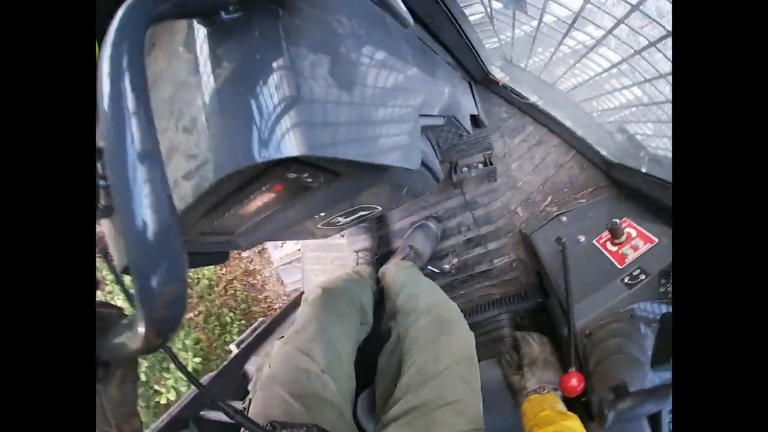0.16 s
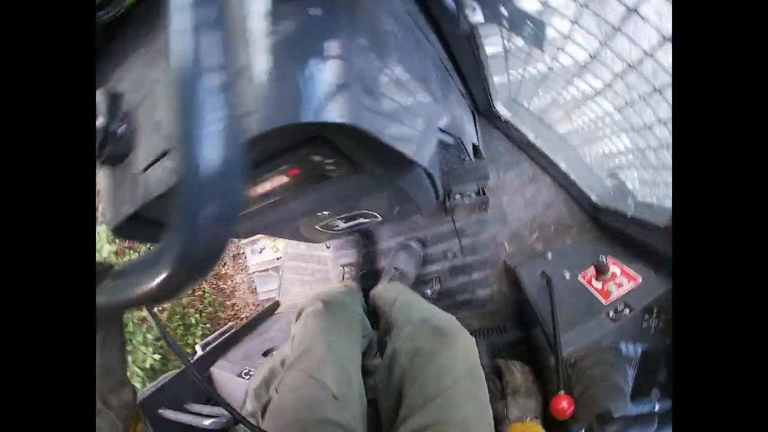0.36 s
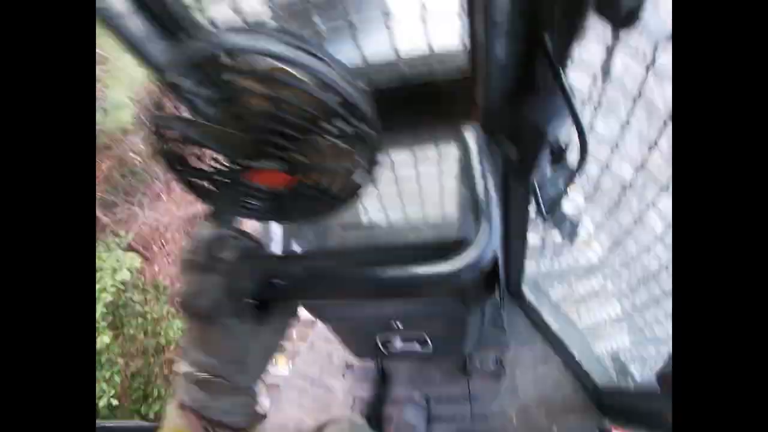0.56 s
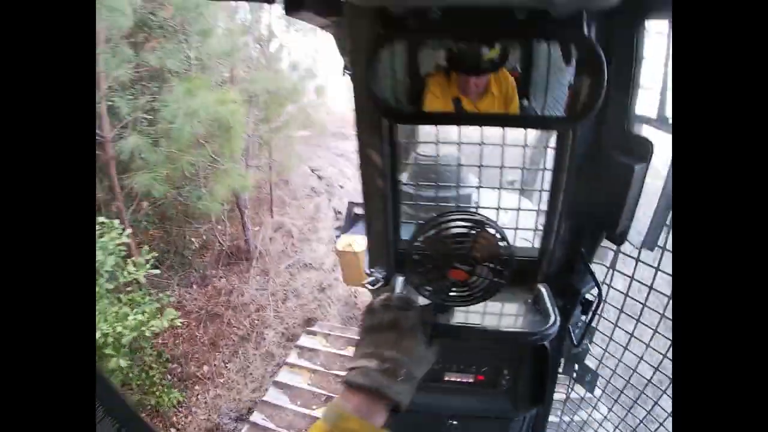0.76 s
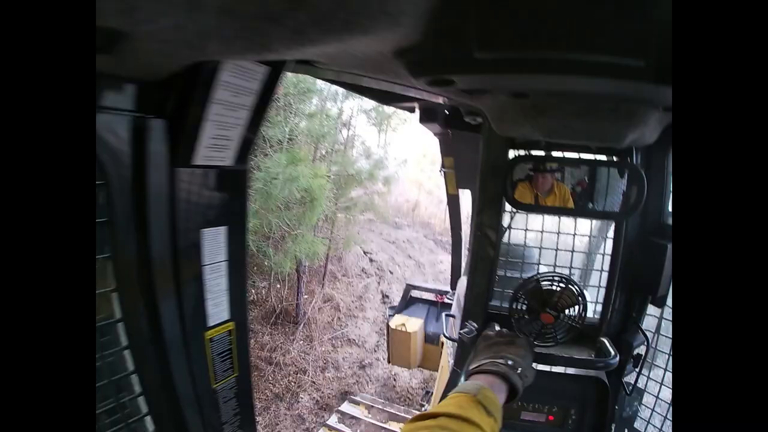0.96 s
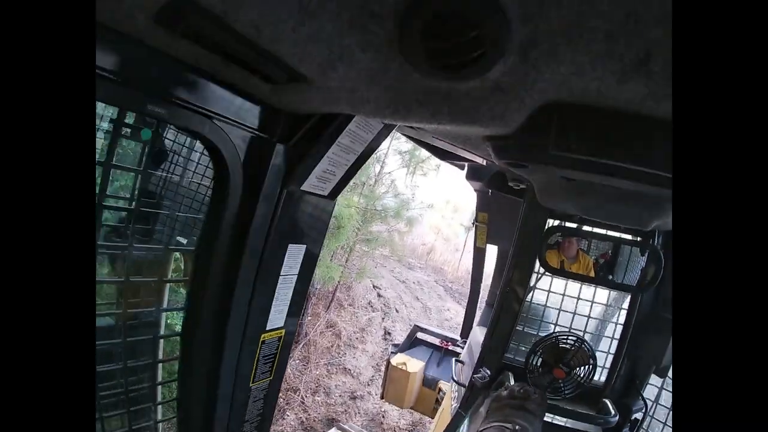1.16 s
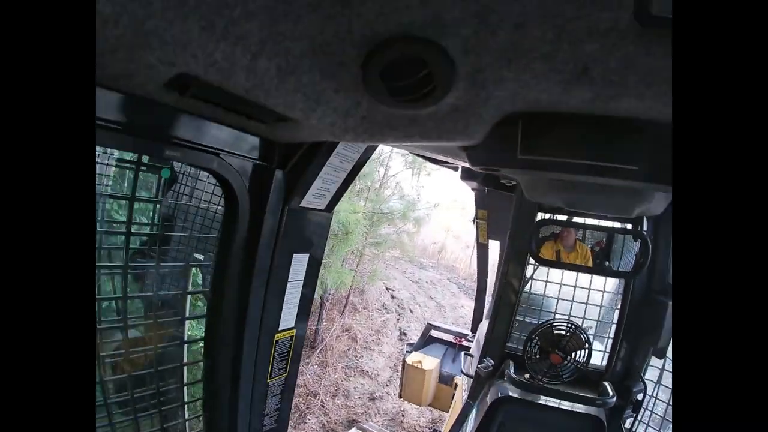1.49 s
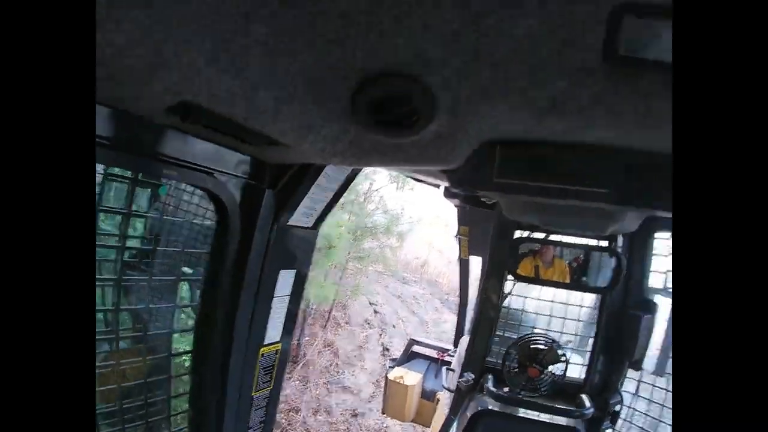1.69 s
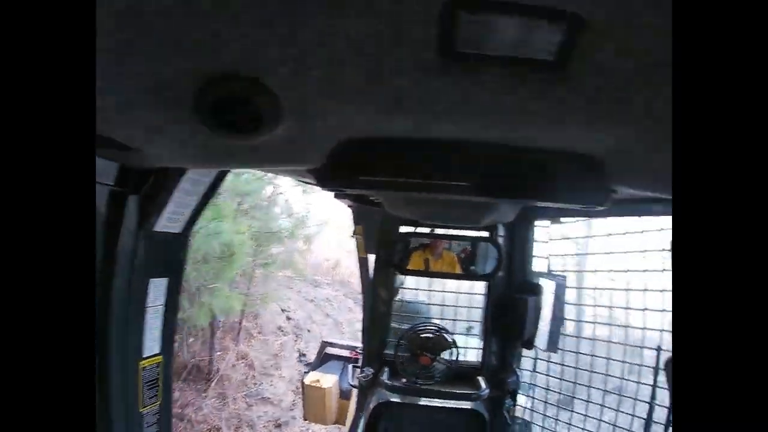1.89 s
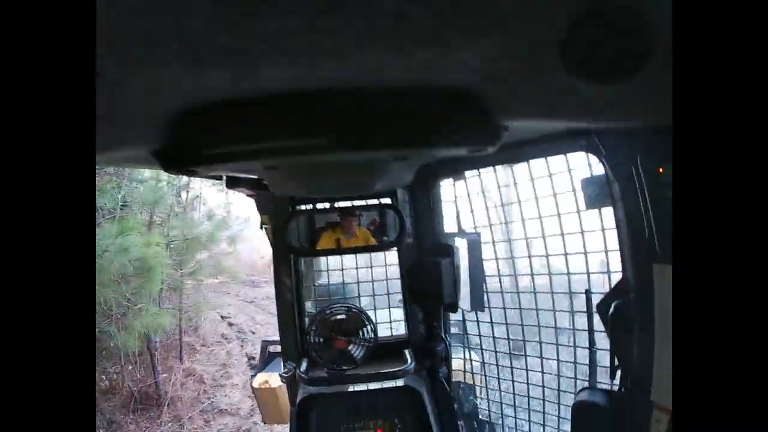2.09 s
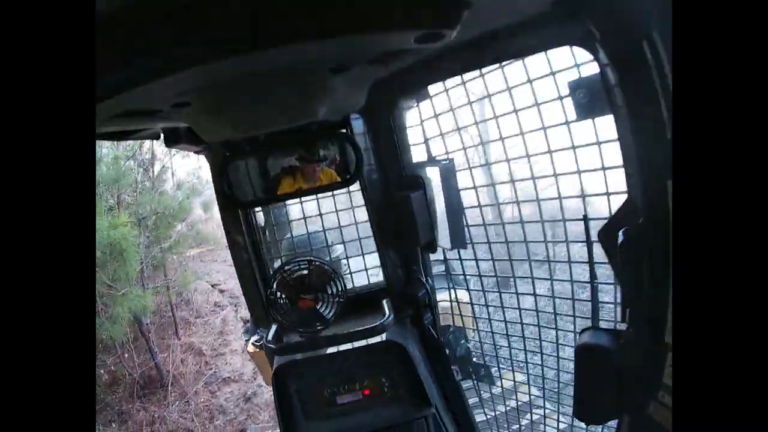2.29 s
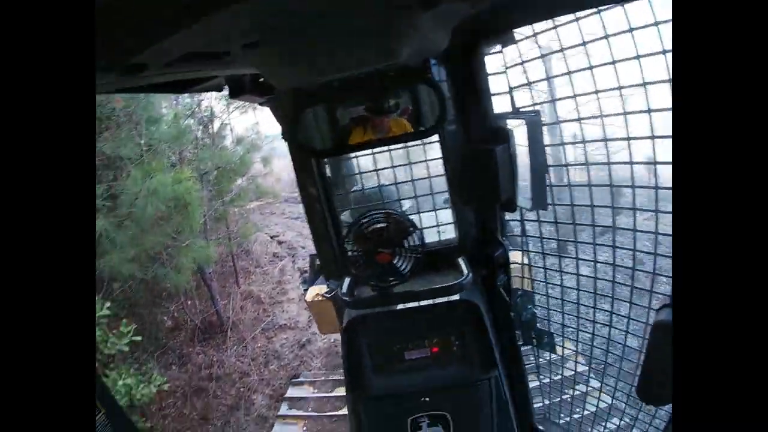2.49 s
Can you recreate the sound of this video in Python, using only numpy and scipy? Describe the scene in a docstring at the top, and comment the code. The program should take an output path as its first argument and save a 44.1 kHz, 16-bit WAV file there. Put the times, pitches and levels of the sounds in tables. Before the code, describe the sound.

A diesel engine rumbles at constant speed inside a closed bulldozer cab, heard close at the driver's head. At first, low firing tones and steady pump hum sit in a dull roar, with a faint whistle gone by about 0.4 s. From 0.7 s a deep fan drone swells; booms and faint hollow rings waver until 2 s. Near 2.2 s a panel ring briefly flares. Soft combustion clatter pulses throughout.

```python
"""A four-cylinder diesel runs at a steady speed, heard at the driver's head in the closed cab of a crawler dozer.
First the head is low: firing tones and pump hum in a dull filtered-noise roar, with a thin whistle that soon fades.
As the head rises through the standing waves of the cab, the fan drone grows, then booms and panel rings come and go.
Past 2 s it sinks most of the way back and a panel ring flares. Tones are fluttering sines at levels drawn over time;
faint combustion clatter pulses the treble of the roar throughout."""
import sys
import numpy as np
from scipy import signal
from scipy.fft import rfft, irfft
from scipy.io import wavfile
from scipy.ndimage import uniform_filter1d

SR = 44100
rng = np.random.default_rng(int(sys.argv[2]) if len(sys.argv) > 2 else 0)


def transcribe(u):
    """Save the signal u as a 16-bit wav file named by the first command-line argument.

    u: samples, shape (n,) or (channels, n), limited to [-1, 1]; the rate is SR.
    q: integer samples, one column per channel.
    """
    v = np.clip(np.atleast_2d(u).T, -1, 1)
    q = np.round(v * 32767).astype(np.int16)
    wavfile.write(sys.argv[1], SR, q)


N = 116865
T = np.arange(N) / SR

# Levels are in dB re full scale, before the gain control on the bass; "gain_db" is added to another level.
# Height of the head: time_s, height (0 bent down - 1 upright)
HEAD_HEIGHT = [(0, 0), (.55, 0.22), (.8, 0.31), (1.1, 0.68), (1.5, 0.83), (1.95, 0.81), (2.25, 0.5),
               (2.5, 0.36), (2.65, 0.21)]

# Engine tones: multiple of the crank rate, down_db, upright_db
ENGINE_ORDERS = [(1, -50, -57.5), (4, -61, -55.5), (5, -52, -61), (7, -53, -53.5), (9, -53, -67.5),
                 (10, -60.5, -53), (12, -66.5, -52.5), (13, -70.5, -60), (14, -62.5, -61.5)]
# Firing tone: time_s, level_db
FIRING_LEVEL = [(0, -46.5), (.75, -47.5), (.87, -45), (1.0, -44), (1.22, -40), (1.45, -42.5), (1.54, -53),
                (1.61, -42), (1.68, -49), (1.74, -38.5), (2.04, -46), (2.11, -55), (2.17, -39), (2.32, -45),
                (2.65, -52.5)]
# Third harmonic of the firing tone: time_s, level_db
THROB_LEVEL = [(0, -47.5), (.15, -43), (.7, -42), (.8, -43.5), (.96, -38.5), (1.02, -49), (1.14, -42),
               (1.22, -53), (1.38, -46.5), (2.2, -51.5), (2.65, -46)]
# Fan drone: time_s, level_db
FAN_LEVEL = [(0, -58), (.45, -57.5), (.65, -44.5), (.85, -37.5), (1.3, -40), (1.52, -36), (2.1, -37),
             (2.65, -39)]

# Pump harmonics under the hum's gain curve: multiple of the pump rate, down_db, upright_db, flutter (0-1)
PUMP_TONES = [(1, -45, -46.5, .25), (4, -67.5, -74, 0.98), (5, -71.5, -66, 0.5)]
# Swell of those pump harmonics: time_s, gain_db
PUMP_GAIN = [(0, 1.5), (.35, 4), (.76, -0.5), (.86, -13), (1.0, -3.5), (1.85, 3), (2.2, -5), (2.45, -0.5),
             (2.65, -20)]
# Second and third pump harmonics, with standing waves of their own: time_s, level_db
PUMP_SECOND_LEVEL = [(0, -49.5), (.15, -45), (.38, -46), (.52, -47), (.76, -46.5), (.85, -56.5),
                     (.98, -49.5), (1.15, -50.5), (1.25, -43.5), (1.36, -50), (1.52, -48.5), (1.67, -46),
                     (1.8, -47), (2.1, -50.5), (2.65, -55.5)]
PUMP_THIRD_LEVEL = [(0, -59), (.25, -56), (.35, -72.5), (.62, -72), (.7, -63), (.77, -74), (.98, -67.5),
                    (1.05, -57), (1.32, -61), (1.45, -71), (2.65, -63)]

# Narrow air resonances of the cab: time_s, level_db
LOW_BOOM_LEVEL = [(0, -43.5), (.2, -37.5), (0.348, -39), (.55, -38), (.85, -42), (1.1, -51), (2.0, -61.5),
                  (2.3, -56), (2.5, -41.5), (2.65, -67)]
HIGH_BOOM_LEVEL = [(0, -38.5), (.45, -48), (.72, -56.5), (1.2, -56.5), (1.3, -39), (1.42, -46.5),
                   (1.6, -58), (1.7, -37.5), (1.78, -47.5), (2.06, -41), (2.14, -58), (2.26, -51),
                   (2.32, -57.5), (2.65, -50)]
# Panel rings: time_s, level_db
LOW_RING_LEVEL = [(0, -71.5), (1.899, -72.5), (2.08, -62), (2.15, -62), (2.24, -51), (2.3, -75),
                  (2.65, -77)]
HIGH_RING_LEVEL = [(0, -84), (1.0, -74.5), (1.33, -66.5), (1.42, -60), (1.68, -62), (1.8, -64),
                   (1.98, -72.5), (2.65, -77)]
# Panel rings, before their wander: time_s, pitch_hz
LOW_RING_PITCH = [(0, 943), (1.8, 980), (2.05, 1040), (2.17, 1073), (2.25, 1050), (2.65, 1040)]
HIGH_RING_PITCH = [(0, 1310), (1.3, 1315), (1.5, 1340), (1.68, 1305), (1.82, 1340), (2.65, 1310)]

# Other steady machine hums: pitch_hz, down_db, upright_db, flutter (0-1)
MACHINE_HUMS = [(59.55, -48.5, -49.5, 0.2), (856.5, -79.5, -69, 1)]
# Gear whine: time_s, level_db
GEAR_LEVEL = [(0, -58.5), (.35, -61), (.48, -67), (.74, -72), (.87, -56.5), (1.3, -70), (1.48, -62.5),
              (1.8, -55.5), (2.12, -67), (2.24, -64), (2.4, -61), (2.65, -58.5)]
# Thin whistle: time_s, level_db
WHISTLE_LEVEL = [(0, -68), (.04, -66.5), (.26, -67.5), (.31, -62), (.355, -61), (.385, -76), (.72, -79),
                 (.85, -71.5), (.93, -72.5), (1.0, -84), (1.2, -80), (1.3, -72), (1.6, -78), (2.65, -79)]
# Thin whistle: time_s, pitch_hz
WHISTLE_PITCH = [(0, 2095), (.9, 2092), (1.25, 2110), (2.65, 2104)]

# Roar spectrum low down and high up in the cab, before its swells: freq_hz, density_db (per Hz)
ROAR_DOWN = [(15,-83), (28,-78), (45,-62.5), (70,-74.5), (105,-60), (128,-55), (160,-64.5), (195,-63),
             (235,-64), (290,-77), (355,-69.5), (405,-78.5), (500,-71.5), (580,-75.5), (660,-77), (740,-79),
             (950,-83.5), (1080,-84), (1650,-94), (2800,-99), (3600,-102), (5600,-105), (6100,-113),
             (6500,-114), (7500,-121), (10200,-125), (13500,-136)]
ROAR_UP = [(15,-79.5), (28,-71.5), (45,-62), (70,-66), (103,-55.5), (125,-69), (160,-65.5), (190,-65),
           (240,-74), (275,-66.5), (360,-69.5), (440,-63.5), (570,-82.5), (670,-83.5), (730,-85.5),
           (890,-81.5), (1180,-85.5), (1340,-83), (1650,-92), (1900,-90), (2250,-94.5), (2800,-89.5),
           (3600,-101), (4500,-105), (5600,-105.5), (6100,-112.5), (6500,-114), (7500,-121), (10200,-125),
           (13500,-137)]
# Swells of the lower, middle, hollow and upper regions of the roar: time_s, gain_db at the region's centre
LOWER_GAIN = [(0, 5.5), (.4, -9.5), (.7, -2.5), (.92, 13.5), (1.12, 4), (1.4, -1), (2.15, -2.5), (2.45, 7),
              (2.65, 1)]
MIDDLE_GAIN = [(0, 1.5), (.45, 3), (.7, -8.5), (1.0, -2), (1.3, 1), (1.9, -3), (2.2, -6), (2.65, -10)]
HOLLOW_GAIN = [(0, -1), (.36, 0.5), (.6, -1.5), (.85, 0.5), (.98, 9.5), (1.08, -1), (1.4, -0.5),
               (2.65, -4.5)]
UPPER_GAIN = [(0, -3), (.5, -7), (1.0, 0), (1.8, 4), (2.05, 5.5), (2.2, -0.5), (2.4, 2.5), (2.65, 3.5)]

CRANK_HZ, FAN_HZ, PUMP_HZ, GEAR_HZ = 26.55, 86.83, 216.1, 920.3
SPEED_WANDER = 0.00091   # relative spread of the engine speed
LOW_BOOM_HZ, HIGH_BOOM_HZ = 126.86, 187
FLUTTER_RATE_HZ, ROUGH_RATE_HZ, WANDER_RATE_HZ = 4.34, 14, 12   # corner rates of the slow chance
ENGINE_FLUTTER, FAN_FLUTTER, GEAR_FLUTTER, WHISTLE_FLUTTER = .15, .031, .5, .12
SECOND_FLUTTER_DOWN, SECOND_FLUTTER_UP, THIRD_FLUTTER = .15, .9, .6
PATCHY_DB, PATCHY_RATE_HZ = 1.0, 13   # chance level spread of each roar band
CLATTER_FROM_HZ, CLATTER_DEPTH, CLATTER_SHARPNESS = 800, .19, 3.3
WEAK_FIRING_DB, FIRING_SPREAD_DB = 5, 2   # drop of every other swell; chance spread
SQUEEZE_BELOW_HZ, SQUEEZE_FROM_DB, SQUEEZE_SHARE = 400, -35, .47   # share of the dB above threshold removed
SQUEEZE_WINDOW_S, BASS_MAKEUP_DB = .016, .88
CUTOFF_HZ = 14500


def from_db(db):
    """Decibels to gain."""
    return 10 ** (np.asarray(db) / 20)


def in_time(rows):
    """A curve over time, joined by straight lines."""
    return np.interp(T, *np.transpose(rows))


def at_hz(points, hz):
    """A spectrum read on a log-frequency axis."""
    f, db = np.transpose(points)
    return np.interp(np.log(hz + 1e-6), np.log(f), db)


def drift(rate_hz):
    """Slow chance of spread 1: noise through a two-pole lowpass, drawn every 40 samples."""
    pole = np.exp(-2 * np.pi * rate_hz * 40 / SR)
    noise = rng.standard_normal(N // 40 + 2002)
    slow = signal.lfilter([1], [1, -2 * pole, pole ** 2], noise)[2000:]  # skip the filter's start
    return np.interp(np.arange(N) / 40, np.arange(len(slow)), slow / slow.std())


def at_head(down_db, up_db):
    """Gain of a sound whose level in dB follows the height of the head."""
    return from_db(down_db + (up_db - down_db) * in_time(HEAD_HEIGHT))


def tone(turns, flutter, rate_hz=FLUTTER_RATE_HZ):
    """A sine of about rms 1 that flutters in level and phase."""
    shake = 1 + flutter * (drift(rate_hz) + 1j * drift(rate_hz)) / np.sqrt(2)
    spin = np.exp(2j * np.pi * (turns + rng.random()))
    return np.sqrt(2 / (1 + flutter ** 2)) * np.real(shake * spin)


def engine(clock):
    """Orders of the crankshaft; two firings per turn give the firing tone and its throbbing third harmonic."""
    orders = sum(at_head(down_db, up_db) * tone(round(multiple) * CRANK_HZ * clock, ENGINE_FLUTTER)
                 for multiple, down_db, up_db in ENGINE_ORDERS)
    firing = from_db(in_time(FIRING_LEVEL)) * tone(2 * CRANK_HZ * clock, ENGINE_FLUTTER)
    throb = from_db(in_time(THROB_LEVEL)) * tone(6 * CRANK_HZ * clock, ENGINE_FLUTTER)
    return orders + firing + throb


def fan(clock):
    """The blade rate is one nearly steady tone that grows strong as the head rises."""
    return from_db(in_time(FAN_LEVEL)) * tone(FAN_HZ * clock, FAN_FLUTTER)


def pump(clock):
    """Harmonics of the hydraulic pump; the second is clean low in the cab and rough higher up."""
    hum = sum(at_head(down_db, up_db) * tone(round(multiple) * PUMP_HZ * clock, flutter)
              for multiple, down_db, up_db, flutter in PUMP_TONES)
    roughness = SECOND_FLUTTER_DOWN + (SECOND_FLUTTER_UP - SECOND_FLUTTER_DOWN) * in_time(HEAD_HEIGHT)
    second = from_db(in_time(PUMP_SECOND_LEVEL)) * tone(2 * PUMP_HZ * clock, roughness, ROUGH_RATE_HZ)
    third = from_db(in_time(PUMP_THIRD_LEVEL)) * tone(3 * PUMP_HZ * clock, THIRD_FLUTTER)
    return from_db(in_time(PUMP_GAIN)) * hum + second + third


def air_booms(clock):
    """Narrow resonances of the cab's air swell and fade as the head moves, wandering a little in pitch."""
    out = 0
    for pitch_hz, wander_hz, flutter, level in [(LOW_BOOM_HZ, 6, .4, LOW_BOOM_LEVEL),
                                                (HIGH_BOOM_HZ, 4, .3, HIGH_BOOM_LEVEL)]:
        wander_turns = wander_hz * np.cumsum(drift(WANDER_RATE_HZ)) / SR
        out = out + from_db(in_time(level)) * tone(pitch_hz * clock + wander_turns, flutter)
    return out


def panel_rings():
    """Narrow resonances of the panels swell and fade as the head moves, shifting in pitch and fluttering."""
    out = 0
    for pitch, wander_hz, flutter, level in [(LOW_RING_PITCH, 18, .9, LOW_RING_LEVEL),
                                             (HIGH_RING_PITCH, 14, .9, HIGH_RING_LEVEL)]:
        hz = in_time(pitch) + wander_hz * drift(WANDER_RATE_HZ)
        out = out + from_db(in_time(level)) * tone(np.cumsum(hz) / SR, flutter, ROUGH_RATE_HZ)
    return out


def whines(clock):
    """Single hums and a gear whine tied to engine speed, and a whistle with a pitch curve of its own."""
    hums = sum(at_head(down_db, up_db) * tone(hz * clock, flutter)
               for hz, down_db, up_db, flutter in MACHINE_HUMS)
    gear = from_db(in_time(GEAR_LEVEL)) * tone(GEAR_HZ * clock, GEAR_FLUTTER, ROUGH_RATE_HZ)
    whistle_turns = np.cumsum(in_time(WHISTLE_PITCH)) / SR
    whistle = from_db(in_time(WHISTLE_LEVEL)) * tone(whistle_turns, WHISTLE_FLUTTER)
    return hums + gear + whistle


def clatter(clock):
    """A gain of rms 1 that swells at each firing, strong and weak in turn and never quite alike."""
    firings = 2 * CRANK_HZ * clock
    count = firings.astype(int)
    chance_db = FIRING_SPREAD_DB * rng.standard_normal(size=400)[count]
    strength = from_db(chance_db - WEAK_FIRING_DB * (count % 2))
    swell = np.abs(np.sin(np.pi * firings)) ** (2 * CLATTER_SHARPNESS)
    gain = 1 + CLATTER_DEPTH * strength * swell
    return gain / np.sqrt(np.mean(gain ** 2))


def roar(clock):
    """Engine and airflow noise through the cab walls, band by band; the treble pulses with the firings."""
    hz = np.arange(N // 2 + 1) * SR / N
    white = rfft(rng.standard_normal(N)) * np.sqrt(SR / 2)  # 0 dB per Hz
    coloured = white * from_db((at_hz(ROAR_UP, hz) + at_hz(ROAR_DOWN, hz)) / 2)
    edges = 14 * 2 ** (np.arange(61) / 6)  # sixth-octave bands from 14 Hz
    # centre in Hz, bell width in octaves, gain in dB
    swells = [(300, .14, in_time(LOWER_GAIN)), (456, .19, in_time(MIDDLE_GAIN)),
              (575, .066, in_time(HOLLOW_GAIN)), (870, .14, in_time(UPPER_GAIN))]
    pulsing = clatter(clock)
    from_halfway = in_time(HEAD_HEIGHT) - .5
    out = 0
    for low, high in zip(edges, edges[1:]):
        centre = np.sqrt(low * high)
        tilt_db = from_halfway * (at_hz(ROAR_UP, centre) - at_hz(ROAR_DOWN, centre))
        swell_db = sum(gain_db * np.exp(-.5 * (np.log2(centre / at) / width) ** 2)
                       for at, width, gain_db in swells)
        band_db = tilt_db + PATCHY_DB * drift(PATCHY_RATE_HZ) + swell_db
        band = from_db(band_db) * irfft(coloured * ((hz >= low) & (hz < high)), N)
        out = out + band * (pulsing if centre > CLATTER_FROM_HZ else 1)
    return out


def scene():
    """One slightly unsteady engine clock drives the machine tones and clatter; all add up at the driver's head."""
    clock = np.cumsum(1 + SPEED_WANDER * drift(2.1)) / SR
    machine = engine(clock) + fan(clock) + pump(clock)
    cab = air_booms(clock) + panel_rings()
    return (machine + cab + whines(clock) + roar(clock))[None]


def record(dry):
    """A fast gain control evens the surges of the bass, and the top is cut."""
    lowpass = signal.butter(2, SQUEEZE_BELOW_HZ, fs=SR, output="sos")
    bass = signal.sosfiltfilt(lowpass, dry)
    window = int(SQUEEZE_WINDOW_S * SR)
    level_db = 10 * np.log10(uniform_filter1d(bass ** 2, window) + 1e-12)
    excess_db = np.maximum(level_db - SQUEEZE_FROM_DB, 0)
    cut_db = uniform_filter1d(SQUEEZE_SHARE * excess_db, window)
    evened = dry - bass + bass * from_db(BASS_MAKEUP_DB - cut_db)
    top_cut = signal.cheby2(12, 60, CUTOFF_HZ, fs=SR, output="sos")  # 60 dB down from the cutoff
    return signal.sosfilt(top_cut, evened)


dry = scene()
out = record(dry)
transcribe(out)
```